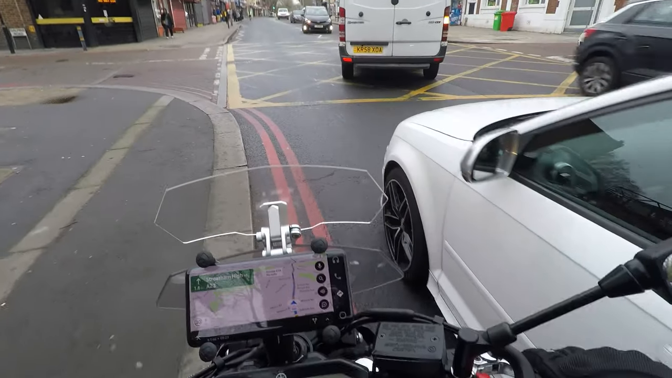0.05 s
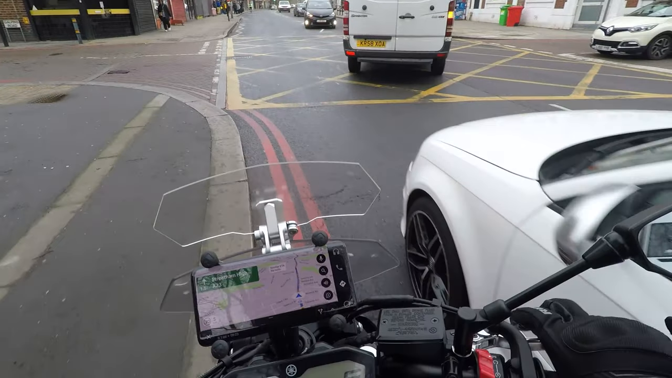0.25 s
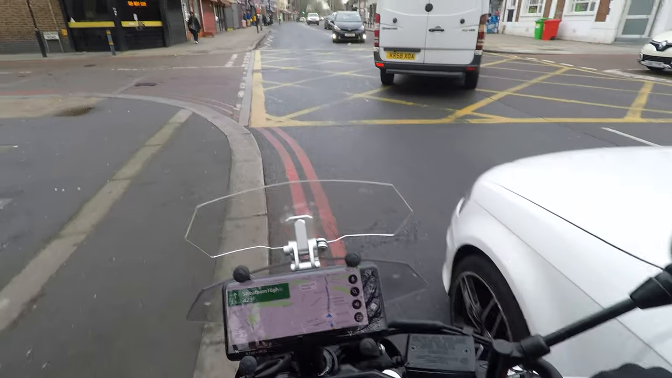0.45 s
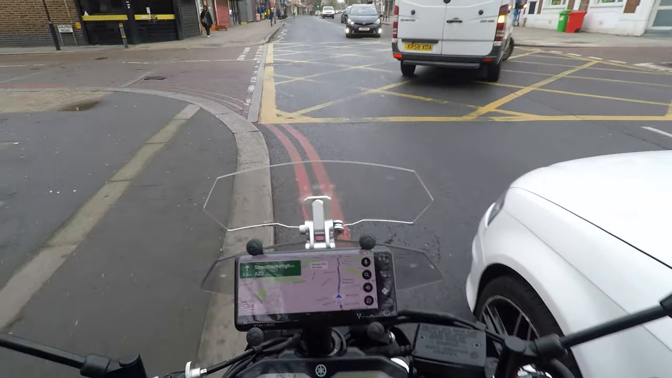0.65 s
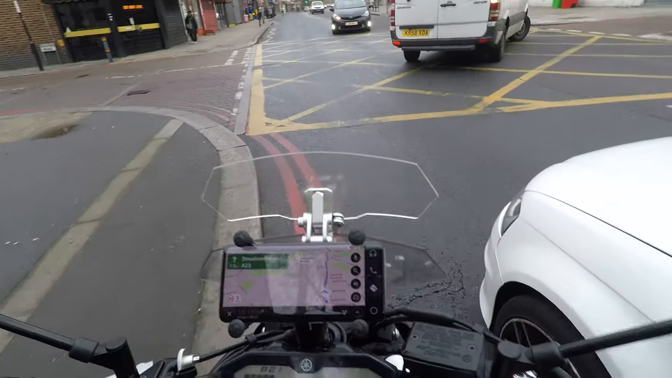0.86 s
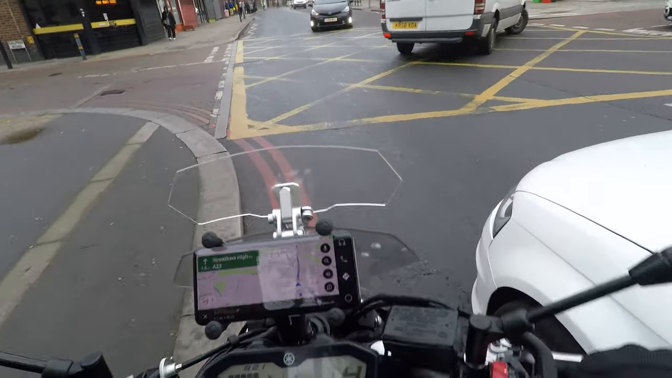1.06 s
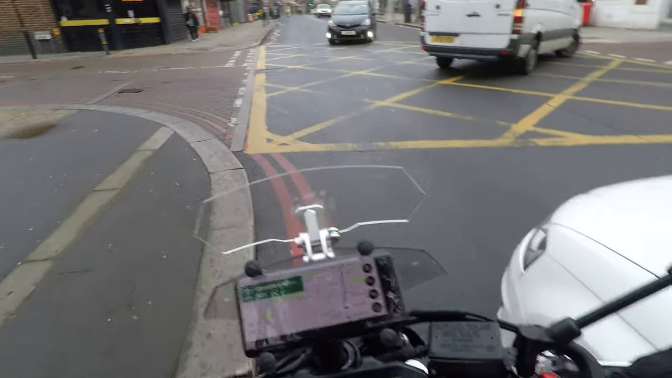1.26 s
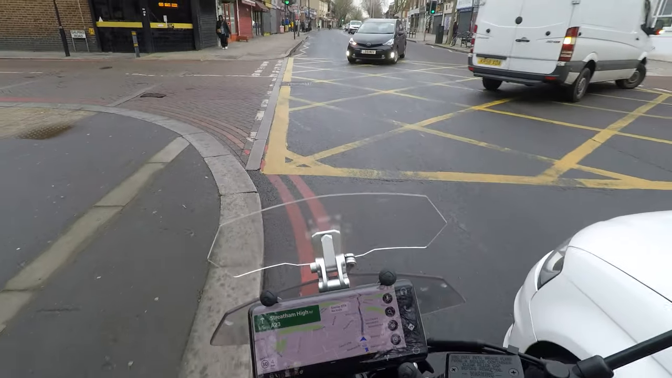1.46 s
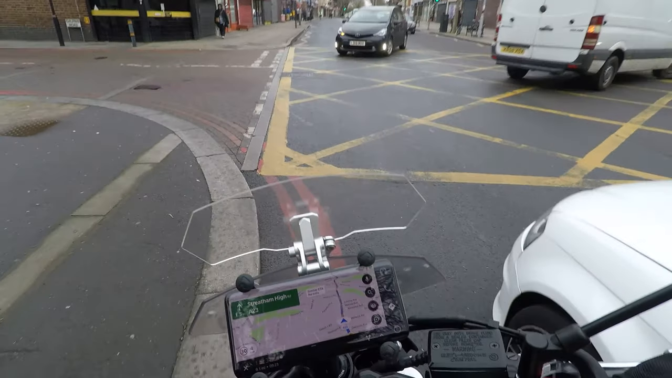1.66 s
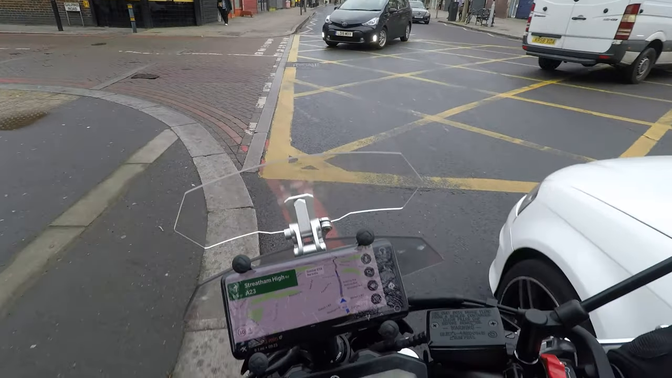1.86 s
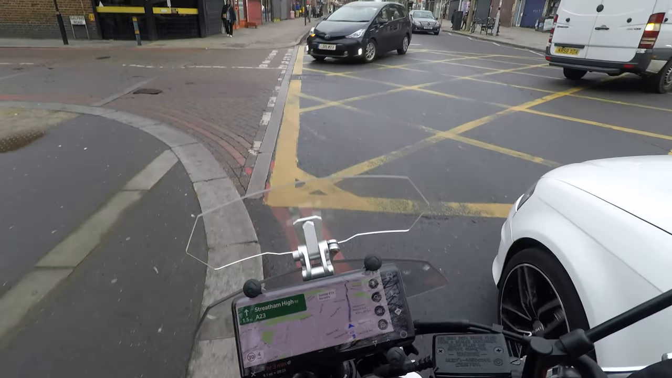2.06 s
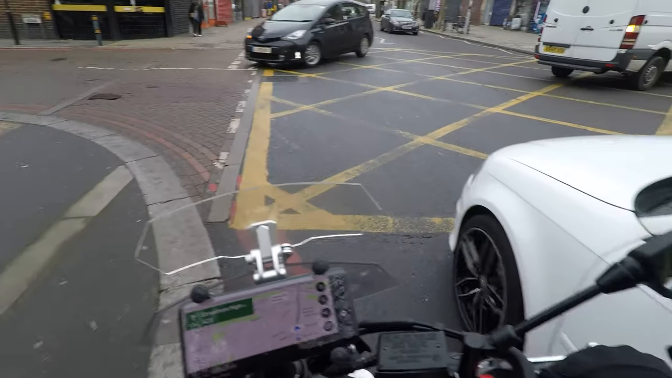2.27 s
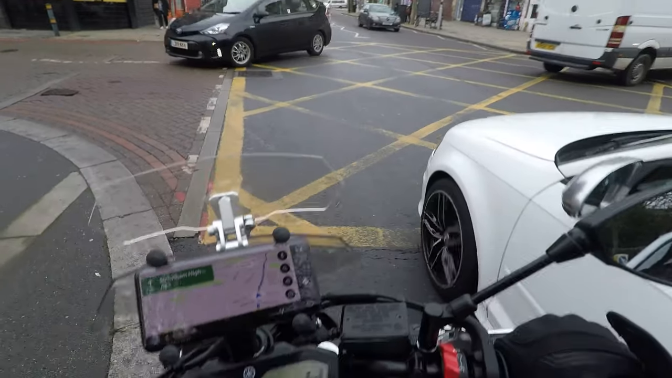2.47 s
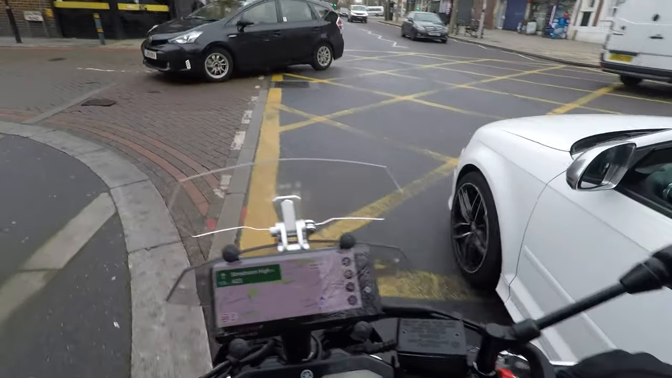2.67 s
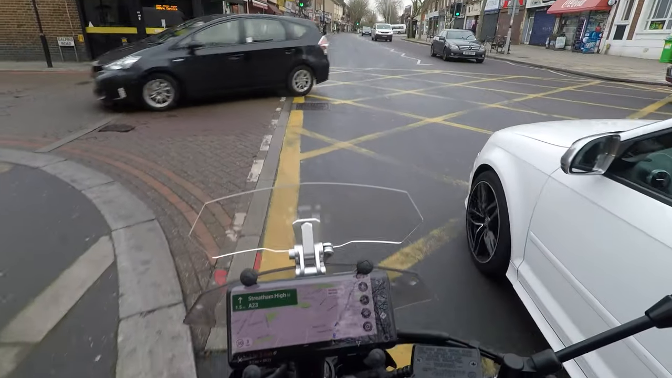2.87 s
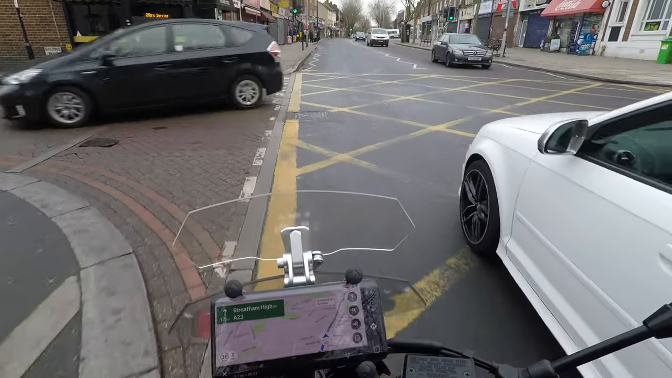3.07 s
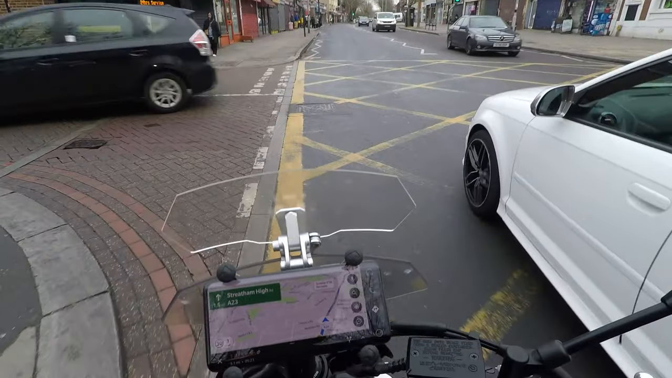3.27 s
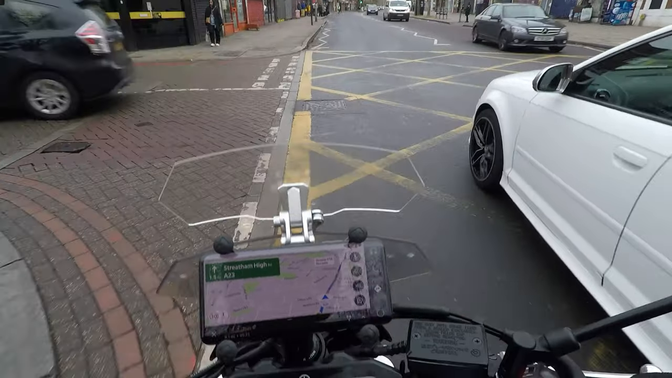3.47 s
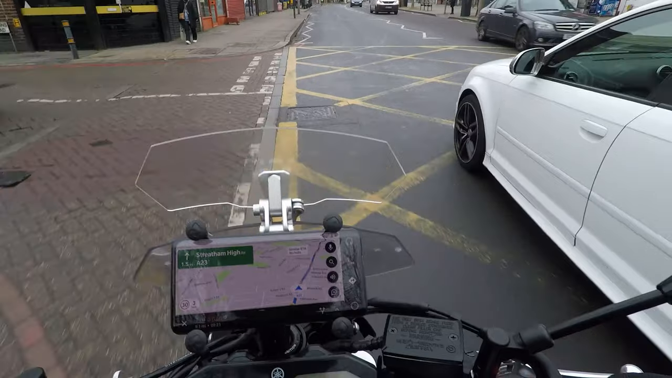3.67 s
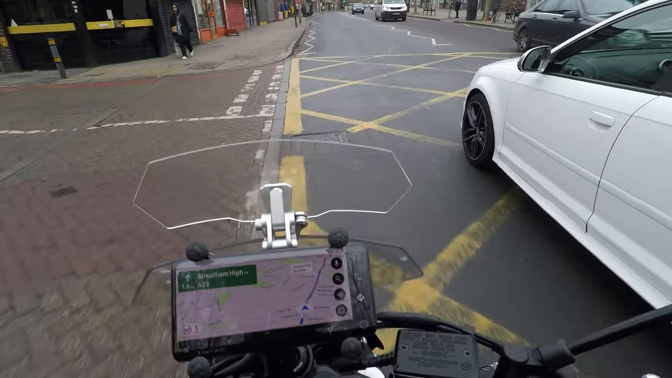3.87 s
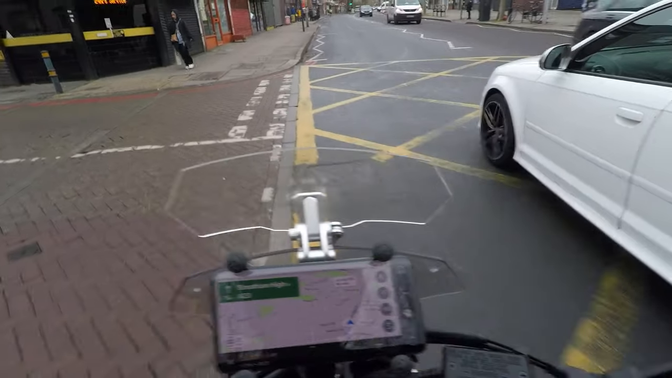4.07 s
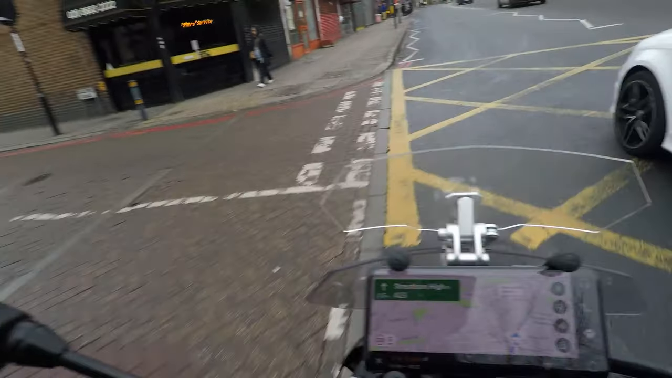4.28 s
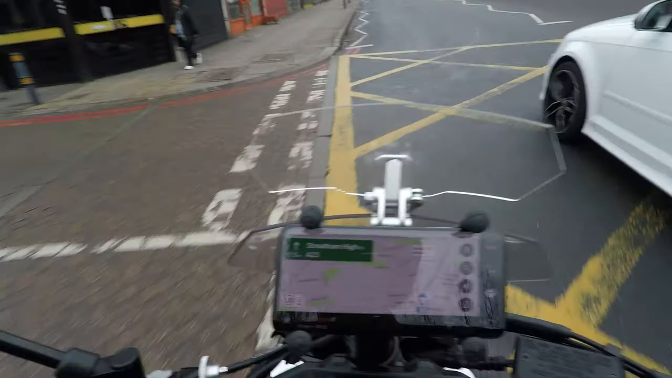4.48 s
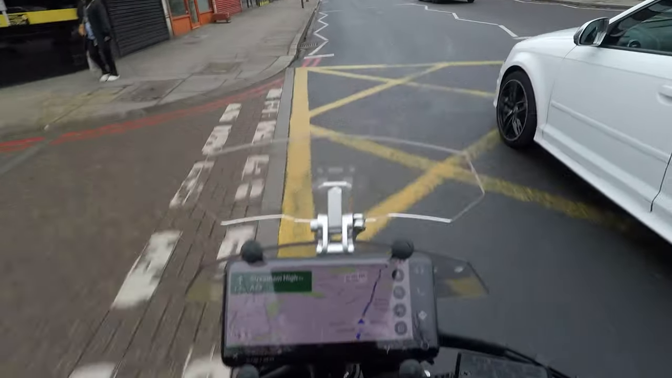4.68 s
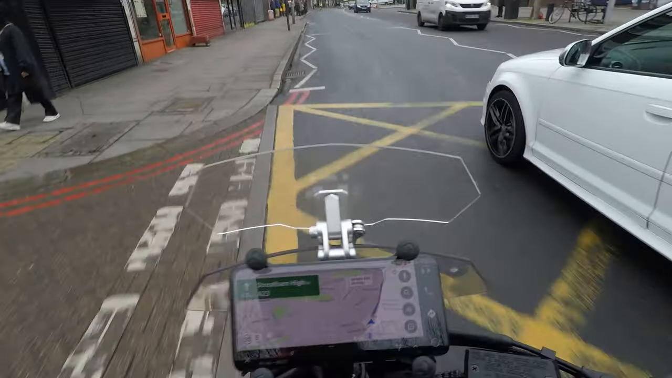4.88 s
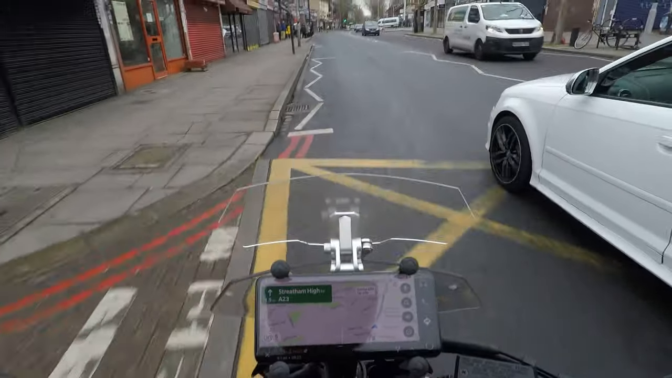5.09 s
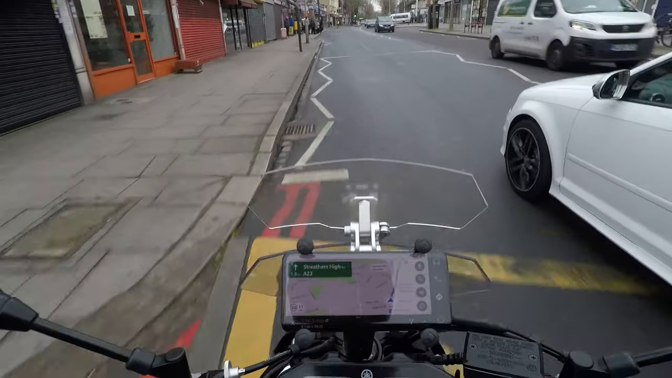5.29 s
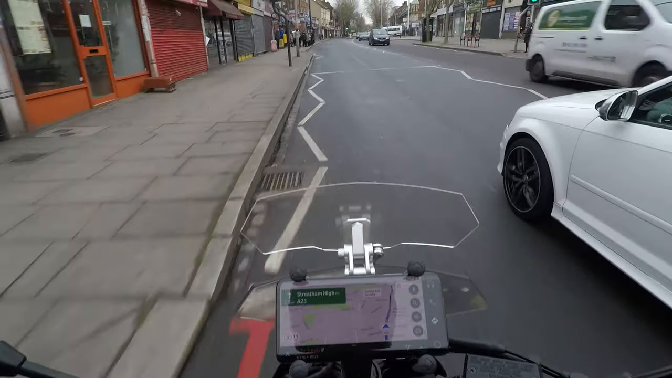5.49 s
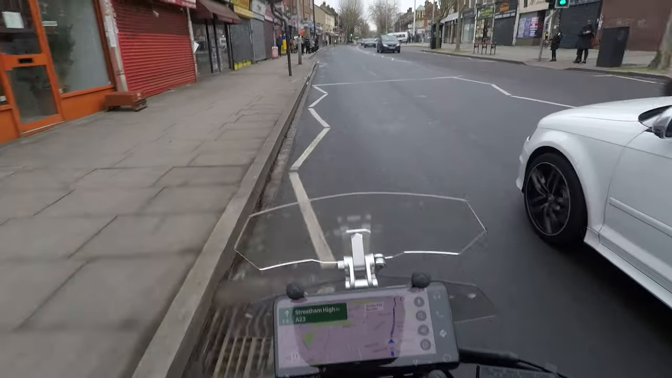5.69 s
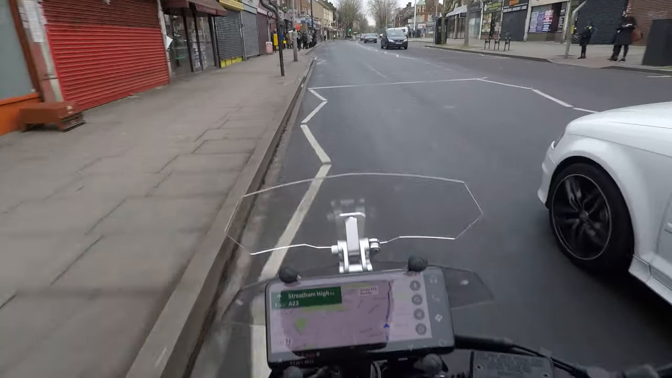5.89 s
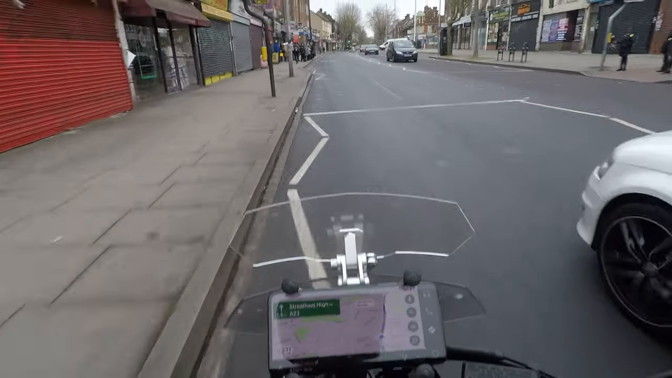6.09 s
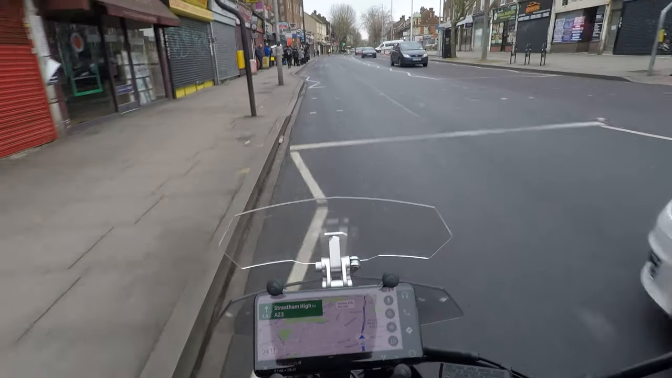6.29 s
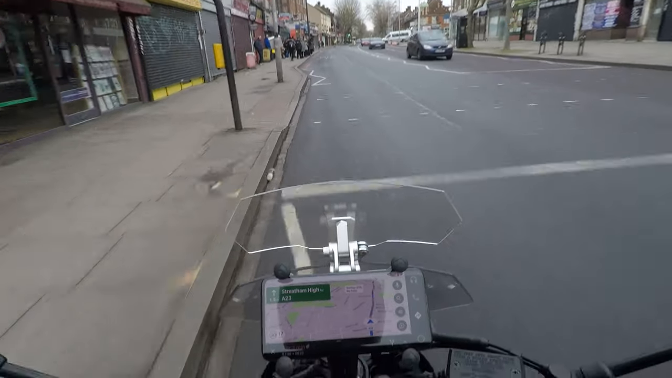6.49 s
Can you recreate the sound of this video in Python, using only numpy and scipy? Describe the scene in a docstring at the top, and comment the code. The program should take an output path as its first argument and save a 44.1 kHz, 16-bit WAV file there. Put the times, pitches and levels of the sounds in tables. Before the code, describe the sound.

A twin-cylinder motorcycle creeps forward in short low-rev blips, then pulls away hard, gear whine and clatter climbing as wind rushes over the rider's microphone.

```python
"""Motorcycle pulling away

A twin-cylinder motorcycle creeps through a junction on the clutch, then pulls away beside an accelerating car.
From the rider's seat we hear exhaust and chain tones locked to the crank, gear whine and bursts of valve clatter.
The car drones in harmonics of its firing rate; struck resonances make the knocks on the microphone mount.
Filtered noise makes the mount's low shaking, the wind and tyre noise that grow with speed, and a thin hiss."""
import sys
import numpy as np
from scipy import signal
from scipy.fft import rfft, irfft, next_fast_len
from scipy.io import wavfile
from scipy.ndimage import uniform_filter1d

SR = 44100
rng = np.random.default_rng(int(sys.argv[2]) if len(sys.argv) > 2 else 0)


def output_pcm(signal):
    """Save a mono or channel-first signal as 16-bit PCM at the path in sys.argv[1].

    Samples are clipped to [-1, 1] before scaling.
    """
    pcm = np.clip(np.atleast_2d(signal).T, -1, 1) * 32767
    wavfile.write(sys.argv[1], SR, np.round(pcm).astype(np.int16))


N = 288414
TIME = np.arange(N) / SR   # seconds

# crank speed, three blips on the clutch and then the pull-away: (time [s], speed [turns per s])
CRANK_SPEED = [(0, 24), (.62, 22.8), (.95, 38.5), (1.12, 42), (1.4, 32.5), (1.65, 26.5), (1.83, 26.7),
               (2.15, 38.3), (2.43, 40.3), (2.68, 35.5), (2.87, 29), (3.13, 29.7), (3.34, 46.5),
               (3.5, 49.4), (3.75, 45), (4.17, 40.7), (4.69, 49.6), (5, 61), (5.6, 73.3), (6.15, 93.7),
               (6.54, 100)]
# twists of the throttle: (start [s], start of closing [s], opening [0-1])
THROTTLE_TWISTS = [(.72, 1.123, 0.73), (1.9, 2.6, 0.9), (3.13, 3.55, 0.3), (4.797, 5.893, 1),
                   (6.249, 6.54, 0.9)]
# the twin's exhaust note: (multiple of the four-stroke cycle rate [-], level [dB])
EXHAUST_HARMONICS = [(3, -1), (4, -10.5), (5, -2), (6, -2.5), (7, -13.5), (8, -6), (9, -18), (10, -11.5),
                     (11, -25), (12, -19), (13, -10.5), (14, -21), (16, -18), (18, -43), (20, -25),
                     (22, -36), (24, -30), (26, -28.5), (28, -30)]
# loudness of the intake box at each pitch: (frequency [Hz], relative level [dB])
AIRBOX_SPECTRUM = [(150, -45), (300, -49), (390, 4), (450, 13.5), (500, 9.5), (580, -20), (800, -7),
                   (2000, -55)]
# valve and piston contacts: (place in the cycle [0-1], level [dB])
ENGINE_CONTACTS = [(0, -0.5), (0.139, -6.5), (.375, 0.5), (0.518, -4.5), (.67, -2.5), (.85, -30)]
# colour of the lower clatter: (frequency [Hz], relative level [dB per Hz])
CLATTER_SPECTRUM = [(350, -16), (500, -33), (680, -18.5), (900, -11.5), (1200, -12), (1400, -9),
                    (1700, 0.5), (2200, -4.5), (2700, -3.5), (3300, -6), (4400, -14), (5500, -21),
                    (6500, -23.5), (9000, -35)]
# colour of the bright ticking: (frequency [Hz], relative level [dB per Hz])
TICKING_SPECTRUM = [(3000, -11), (5300, 7), (6200, -3.5), (7100, -3.5), (7900, -1.5), (8500, -8.5),
                    (9300, -4), (11000, -7), (12500, -14.5), (15200, -20.5)]
# ringing of the engine covers and fairing: (centre [Hz], width [Hz], lift [dB])
PANEL_RINGING = [(1170, 82, 1), (1327, 13, 0.5), (1851, 14, -9), (1935, 340, 6.5), (2510, 40, -0.5),
                 (2492, 146, 4.5), (2593, 34, 8), (2870, 49, 0.5), (3030, 60, 0.5), (3810, 126, 5),
                 (4420, 91, 4), (5624, 140, 6.5), (7020, 470, 6), (9170, 230, 4)]
# the whine swells as its pitch crosses resonances of the gear case: (frequency [Hz], level [dB])
GEAR_CASE_RESPONSE = [(900, -66.5), (1080, -65), (1175, -56.5), (1290, -61), (1420, -59), (1560, -44.5),
                      (1640, -49), (1750, -42), (1950, -39), (2100, -44), (2400, -43.5), (2660, -34.5),
                      (2900, -47), (3500, -46.5), (3800, -41), (4100, -41), (8000, -56)]
# load on the gear teeth as the rider feeds the clutch: (time [s], change of whine [dB])
GEAR_LOAD_CURVE = [(0, 4.5), (.6, -4.5), (1.4, -7), (2.2, -8), (2.5, 1), (2.9, 0), (3.15, -1), (3.45, -1),
                   (4.4, 0.5), (5.3, 0.5), (6.54, 2)]
# the car alongside: (time [s], firing rate [firings per s], drone level [dB])
CAR_DRONE = [(0, 33.5, -50), (.5, 33.2, -44.5), (1, 43, -45), (2.2, 40, -51.5), (2.9, 45.7, -47.5),
             (4.1, 51, -41), (4.8, 64, -42), (5.7, 83, -43), (6.03, 58, -41), (6.54, 58, -46)]
# the car's exhaust note: (multiple of the firing rate [-], level [dB])
CAR_HARMONICS = [(1, 9), (2, -2), (3, -9.5), (4, -14), (5, -19.5), (6, -26.5), (7, -22.5), (8, -25.5),
                 (9, -27), (10, -27.5), (11, -24), (12, -32), (14, -28.5), (16, -23.5)]
# knocks: (time [s], level before a shared lift [dB], change of the low thud [dB], contact softness [s])
MOUNT_KNOCKS = [(0.278, -27, -9, 0.0011), (1.302, -24.5, 9, 0.00048), (1.662, -31, -6, 0.00049),
                (2.001, -26.5, 3, 0.00017), (2.376, -29, -13, 0.0011), (2.746, -18.5, -4, 0.00073),
                (4.246, -11.5, -4, 0.00064), (4.278, -24.5, -8, 0.00046), (4.341, -28.5, 4, 0.00026),
                (4.967, -19.5, -9, 0.00014), (5.057, -22, -9, 0.00059)]
# ways the mount rings: (frequency [Hz], level [dB], time to fade by 60 dB [s])
MOUNT_MODES = [(69.6, 6, 0.025), (189, -5, 0.019), (253, 0, 0.023), (462, -3, 0.021), (745, -8, 0.011),
               (1090, -2, 0.011), (1520, -2.5, .01)]
# level of the mount's low sway: (time [s], level [dB])
SWAY_LEVEL = [(0, -30.5), (.3, -19), (.48, -33.5), (.9, -24.5), (1.07, -34), (1.28, -22), (1.8, -22.5),
              (2.27, -35), (2.5, -27), (2.9, -20.5), (3.7, -31), (4.3, -23.5), (4.7, -17.5), (5.4, -18),
              (6.2, -23), (6.54, -18)]
# colour of the sway: (frequency [Hz], relative level [dB per Hz])
SWAY_SPECTRUM = [(8, -18), (18, -12.5), (24, -2), (28, 1.5), (33, -3.5), (42, -20), (60, -37), (120, -101),
                 (400, -99)]
# colour of the air buffeting: (frequency [Hz], relative level [dB per Hz])
BUFFET_SPECTRUM = [(6, -27), (13, 14), (20, -0.5), (24, -2), (30, -70), (60, -44), (200, -93)]
# riding speed: (time [s], speed [m per s])
RIDING_SPEED = [(0, 1.15), (.7, 3.14), (1.7, 1.95), (2.3, 2.1), (2.9, 2.4), (3.4, 3.85), (3.9, 3.25),
                (4.4, 5), (5.3, 7.05), (6.54, 12.56)]
# colour of the wind: (frequency [Hz], relative level [dB per Hz])
WIND_SPECTRUM = [(15, 28), (45, 24.5), (80, 13.5), (130, 2.5), (220, 2), (350, -1), (550, 0), (1000, -20.5),
                 (3000, -50)]
# colour of the tyre noise: (frequency [Hz], relative level [dB per Hz])
ROAD_SPECTRUM = [(200, -29), (480, -3), (700, -5.5), (1150, 7), (1600, -7.5), (2500, 9), (4000, -3),
                 (8000, -30.5), (15000, -48)]
# level of the thin hiss: (time [s], level [dB])
HISS_LEVEL = [(0, -58.5), (2.7, -58), (3.3, -60), (6.54, -80)]
# colour of the thin hiss: (frequency [Hz], relative level [dB per Hz])
HISS_SPECTRUM = [(3000, -7.5), (4100, 3), (4500, 5), (4900, -9), (5350, 7.5), (5900, -14), (7000, -23)]
# colour of the faint ticks: (frequency [Hz], relative level [dB])
FAINT_TICK_SPECTRUM = [(3000, -20), (6000, -2), (10000, 2), (14000, -3)]
# spells of extra faint ticks: (start [s], end [s])
FAINT_TICK_SPELLS = [(.3, .8), (2.1, 2.4)]

IDLE_REVS_PER_S = 23
GEAR_TEETH, CHAIN_LINKS_PER_TURN = 40, 13.3
THROTTLE_OPEN_S, THROTTLE_CLOSE_S = 0.23, 0.15
# levels at idle, their rise per doubling of the revs, and their rise with the throttle open
EXHAUST_DB, EXHAUST_DB_PER_DOUBLING, EXHAUST_OPEN_DB = -48.5, 0.05, 2.5
AIRBOX_DB, AIRBOX_DB_PER_DOUBLING, AIRBOX_OPEN_DB = -67, 7.5, 7.5
# levels at idle, and their rise for each extra turn per second
CLATTER_DB, CLATTER_DB_PER_REV = -48.5, 0.2889
TICKING_DB, TICKING_DB_PER_REV = -61.5, 0.2035
# the ticking gains this much more between these crank speeds (turns per s)
HARSH_FROM_REVS, HARSH_FULL_REVS, HARSH_DB = 69, 79, 4.5
# the clutch slips until it bites; slipping, it lifts the whine's octave and the ticking
CLUTCH_BITE_S, CLUTCH_BITE_TAKES_S = 3.27, 0.2
SLIP_OCTAVE_DB, SLIP_TICKING_DB = 6, 2
WHINE_OCTAVE_DB = -17   # added to the octave besides the case's response at its pitch
CHAIN_DB = -14   # chain whirr relative to the road noise, reached at 70 turns per s
FAN_HZ, FAN_DB = 317, -67
SURGE_DB, SURGES_PER_S = 2, 7.2   # the sway comes in uneven surges
BUFFET_OVER_WIND_DB, BUFFET_TOP_DB = 10, -22   # buffeting grows with the wind, up to a ceiling
CRUISE_M_PER_S = 12.5
# levels at cruising speed, and their rise per doubling of the speed
WIND_DB, WIND_DB_PER_DOUBLING = -22, 10.5
ROAD_DB, ROAD_DB_PER_DOUBLING = -30.5, 12
STREET_DB = -58.5   # tyres of the surrounding traffic
SPELL_TICKS_PER_S, STRAY_TICKS_PER_S = 28, 3   # spells add to the strays
CUTOFF_HZ = 15250


def from_db(db):
    """Turn decibels into a multiplier."""
    return 10 ** (np.asarray(db) / 20)


def rms_one(x):
    """Scale a sound to an average strength (rms) of 1."""
    return x / np.sqrt(np.mean(x ** 2) + 1e-20)


def noise():
    """White noise: equal strength at all pitches."""
    return rng.standard_normal(N)


def in_time(rows):
    """Read each column of a time curve, sample by sample."""
    s, *columns = np.transpose(rows)
    return [np.interp(TIME, s, column) for column in columns]


def at_hz(points, hz):
    """Read a response in dB at the given frequencies, along a logarithmic pitch scale."""
    points_hz, points_db = np.transpose(points)
    return np.interp(np.log(hz), np.log(points_hz), points_db)


def drift(rate_hz):
    """Smooth random wandering of spread about 1: noise whose parts faster than rate_hz are weakened."""
    step = 40   # samples between the computed points
    hz = np.fft.rfftfreq(2 * N // step, step / SR)
    spectrum = rfft(rng.standard_normal(2 * len(hz) - 2))
    slow = rms_one(irfft(spectrum / (1 + (hz / rate_hz) ** 2)))
    return np.interp(np.arange(N) / step, np.arange(len(slow)), slow)


def coloured(x, spectrum, resonances=()):
    """Filter x by a smooth spectrum with resonant peaks on it; the result has rms 1."""
    size = next_fast_len(N)
    hz = np.fft.rfftfreq(size, 1 / SR) + 1e-3
    db = at_hz(spectrum, hz)
    for centre, width, lift in resonances:
        db = db + lift / (1 + (2 * (hz - centre) / width) ** 2)
    return rms_one(irfft(rfft(x, size) * from_db(db), size)[:N])


def ring(push, hz, t60):
    """A resonance: a unit click sets off a fading sine that starts near height 1."""
    shrink = from_db(-60 / (t60 * SR))   # per sample
    w = 2 * np.pi * hz / SR
    return signal.lfilter([0, np.sin(w)], [1, -2 * shrink * np.cos(w), shrink ** 2], push + 1e-18)


def pipe_note(cycles, harmonics, waver_db, bright_db=0):
    """Exhaust harmonics, each wavering as the burns vary; bright_db per octave lifts those above the eighth."""
    note = 0
    for k, db in harmonics:
        octaves_above_eighth = max(np.log2(k) - 3, 0)
        level_db = db + waver_db * drift(3.9) + bright_db * octaves_above_eighth
        note = note + from_db(level_db) * np.sin(2 * np.pi * (k * cycles + rng.random()))
    return np.sqrt(2) * note


def mesh_tone(teeth, rough, blur_hz):
    """Passing teeth or blades make a tone, smeared by play and turbulence."""
    wobble = 1 + rough * (drift(blur_hz) + 1j * drift(blur_hz))
    return rms_one(np.real(wobble * np.exp(2j * np.pi * teeth)))


def motorcycle(road_db):
    """The crank drives exhaust, intake, valve gear, primary gears and chain; a fan runs steadily."""
    speed, = in_time(CRANK_SPEED)
    turns = np.cumsum(speed) / SR
    cycles = turns / 2   # a four-stroke cycle takes two turns
    opening = throttle()
    slip = np.clip(1 - (TIME - CLUTCH_BITE_S) / CLUTCH_BITE_TAKES_S, 0, 1)
    sound = exhaust(speed, cycles, opening) + throb(speed, turns) + airbox(speed, cycles, opening)
    sound = sound + valve_gear(speed, cycles, slip) + gear_whine(speed, turns, slip)
    return sound + chain(speed, turns, road_db) + fan()


def throttle():
    """The throttle opens and closes in straight ramps at each twist."""
    total = 0
    for start, end, opening in THROTTLE_TWISTS:
        rise = np.clip((TIME - start) / THROTTLE_OPEN_S, 0, 1)
        fall = np.clip(1 - (TIME - end) / THROTTLE_CLOSE_S, 0, 1)
        total = total + opening * rise * fall
    return total


def exhaust(speed, cycles, opening):
    """Exhaust pulses repeat every cycle, so they sound as harmonics of the cycle rate."""
    doublings = np.log2(speed / IDLE_REVS_PER_S)
    level_db = EXHAUST_DB + EXHAUST_DB_PER_DOUBLING * doublings + EXHAUST_OPEN_DB * opening
    bright_db = np.interp(speed, [35, 90], [-6, 6])   # the pulses sharpen at high revs
    return from_db(level_db) * pipe_note(cycles, EXHAUST_HARMONICS, waver_db=0.6, bright_db=bright_db)


def throb(speed, turns):
    """A sine once per crank turn, growing with the square of the speed."""
    return from_db(-29.5 + drift(6)) * (speed / 95) ** 2 * np.sin(2 * np.pi * turns)


def airbox(speed, cycles, opening):
    """Two unevenly spaced intake gulps a cycle, with rushing noise, ring the airbox."""
    gulps = sum(np.diff(np.floor(cycles + place), prepend=0) for place in (0, .375))
    intake = rms_one(gulps * from_db(drift(30))) + .5 * noise()
    doublings = np.log2(speed / IDLE_REVS_PER_S)
    level_db = AIRBOX_DB + AIRBOX_DB_PER_DOUBLING * doublings + AIRBOX_OPEN_DB * opening
    return from_db(level_db) * coloured(intake / np.sqrt(speed), AIRBOX_SPECTRUM)


def valve_gear(speed, cycles, slip):
    """Metal contacts give a clatter and a brighter ticking, both ringing the covers and fairing."""
    over_idle = speed - IDLE_REVS_PER_S
    clatter_db = CLATTER_DB + CLATTER_DB_PER_REV * over_idle
    harsh_db = np.interp(speed, [HARSH_FROM_REVS, HARSH_FULL_REVS], [0, HARSH_DB])
    tick_db = TICKING_DB + TICKING_DB_PER_REV * over_idle + harsh_db + SLIP_TICKING_DB * slip
    clatter = contact_bursts(cycles, decay_s=0.012, uneven_db=1.5, steady=0.77)
    ticks = contact_bursts(cycles, decay_s=0.017, uneven_db=0.5, steady=0.23)
    clatter = from_db(clatter_db) * coloured(clatter, CLATTER_SPECTRUM, PANEL_RINGING)
    return clatter + from_db(tick_db) * coloured(ticks, TICKING_SPECTRUM, PANEL_RINGING)


def contact_bursts(cycles, decay_s, uneven_db, steady):
    """Each contact in the cycle frees a short burst of noise over steady rubbing."""
    hits, count = np.zeros(N), np.arange(int(cycles[-1]))
    for place, db in ENGINE_CONTACTS:
        at = np.searchsorted(cycles, count + place).clip(0, N - 1)
        hits[at] += from_db(db + uneven_db * rng.standard_normal(len(at)))
    strength = signal.lfilter([1], [1, -np.exp(-1 / (decay_s * SR))], hits) + steady
    strength *= from_db(0.86 * np.cos(2 * np.pi * (cycles - .2)))   # swells once a cycle
    strength /= np.sqrt(uniform_filter1d(strength ** 2, size=8000))   # evens out the longer-term level
    return strength * noise()


def gear_whine(speed, turns, slip):
    """Meshing teeth sound a tone and its octave, coloured by the gear case."""
    # each firing jerks the crank, which puts side tones on the whine
    teeth = GEAR_TEETH * turns + 0.092 * np.sin(np.pi * turns) + 0.046 * np.sin(2 * np.pi * turns)
    teeth = teeth + 0.18 * drift(32) * np.minimum(speed / 65, 1) ** 2   # play smears it more at speed
    mesh_hz = GEAR_TEETH * speed
    load_db, = in_time(GEAR_LOAD_CURVE)
    tone_db = load_db + at_hz(GEAR_CASE_RESPONSE, mesh_hz)
    octave_db = load_db + at_hz(GEAR_CASE_RESPONSE, 2 * mesh_hz) + WHINE_OCTAVE_DB + SLIP_OCTAVE_DB * slip
    tone = from_db(tone_db) * mesh_tone(teeth, rough=0.91, blur_hz=70.0)
    return tone + from_db(octave_db) * mesh_tone(2 * teeth, rough=3.2, blur_hz=69.6)


def chain(speed, turns, road_db):
    """Passing chain links whirr, following both the crank and the road speed."""
    level = from_db(road_db + CHAIN_DB) * np.minimum(speed / 70, 1) ** 3
    return level * mesh_tone(CHAIN_LINKS_PER_TURN * turns, rough=0.86, blur_hz=12)


def fan():
    """The blades of a radiator fan hum at a fixed pitch."""
    return from_db(FAN_DB) * mesh_tone(FAN_HZ * TIME, rough=0.17, blur_hz=2.2)


def car():
    """The even drone of a four-cylinder car whose firing rate drops near the end as it changes up."""
    firings, drone_db = in_time(CAR_DRONE)
    bright_db = np.interp(firings, [40, 75], [-9, 1])
    return from_db(drone_db) * pipe_note(np.cumsum(firings) / SR, CAR_HARMONICS, 0.84, bright_db)


def mount_knocks(thud_below_hz=130):
    """Jolts strike the mount and set its resonances ringing; softer contacts push for longer."""
    out = np.zeros(N)
    age = TIME[:SR // 5]
    for start, level_db, thud_db, soft_s in MOUNT_KNOCKS:
        push = age * np.exp(-age / soft_s)
        push = push / push.sum()
        knock = 0
        for hz, db, t60 in MOUNT_MODES:
            knock = knock + from_db(db + thud_db * (hz < thud_below_hz)) * ring(push, hz, t60)
        at = int(start * SR)
        out[at:at + len(age)] -= from_db(level_db + 2.5) * knock
    return out


def mount_shake(wind_db):
    """The mount sways at its own low resonance; faster air adds deeper buffeting."""
    sway = coloured(noise(), SWAY_SPECTRUM)
    power = uniform_filter1d(uniform_filter1d(sway ** 2, size=2600), size=1800)
    sway /= np.sqrt(power)   # evens out the noise so that the level curve sets the strength
    sway_db = in_time(SWAY_LEVEL)[0] + SURGE_DB * drift(SURGES_PER_S)
    buffet_db = np.minimum(wind_db + BUFFET_OVER_WIND_DB, BUFFET_TOP_DB)
    return from_db(sway_db) * sway + from_db(buffet_db) * coloured(noise(), BUFFET_SPECTRUM)


def wind(wind_db):
    """Rushing air: low noise with a slowly wandering level."""
    return from_db(wind_db + 1.3 * drift(3.9)) * coloured(noise(), WIND_SPECTRUM)


def tyre_noise(road_db):
    """Noise of the bike's tyres over a constant floor from other traffic."""
    level = np.hypot(from_db(road_db), from_db(STREET_DB))
    return level * from_db(0.3 * drift(14)) * coloured(noise(), ROAD_SPECTRUM, PANEL_RINGING)


def creep_sounds(tick_db=-40):
    """A thin hiss that fades after the creeping, with sparse bright ticks at random moments."""
    hiss = from_db(in_time(HISS_LEVEL)[0]) * coloured(noise(), HISS_SPECTRUM)
    in_spell = sum((TIME > start) & (TIME < end) for start, end in FAINT_TICK_SPELLS)
    per_s = STRAY_TICKS_PER_S + SPELL_TICKS_PER_S * in_spell
    clicks = (rng.random(N) < per_s / SR) * rng.uniform(.3, 1, N)
    return hiss + from_db(tick_db) * np.std(clicks) * coloured(clicks, FAINT_TICK_SPECTRUM)


def scene():
    """Bike, car, mount, wind and tyres add up at one microphone."""
    doublings = np.log2(np.maximum(in_time(RIDING_SPEED)[0], 1e-3) / CRUISE_M_PER_S)
    wind_db = WIND_DB + WIND_DB_PER_DOUBLING * doublings
    road_db = ROAD_DB + ROAD_DB_PER_DOUBLING * doublings
    vehicles = motorcycle(road_db) + car()
    mount = mount_knocks() + mount_shake(wind_db)
    background = wind(wind_db) + tyre_noise(road_db) + creep_sounds()
    return (vehicles + mount + background)[None]


def record(dry):
    """A steep filter removes the treble above the cutoff."""
    return signal.sosfilt(signal.ellip(12, .1, 90, CUTOFF_HZ, fs=SR, output="sos"), dry)


dry = scene()
out = record(dry)
output_pcm(out)
```